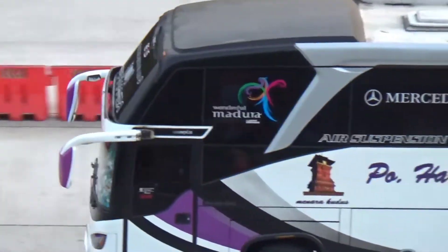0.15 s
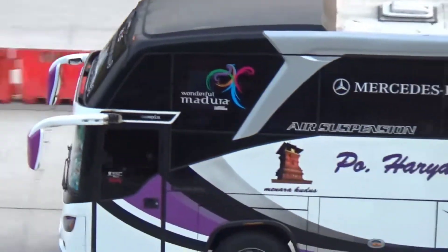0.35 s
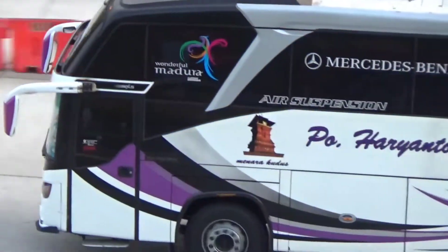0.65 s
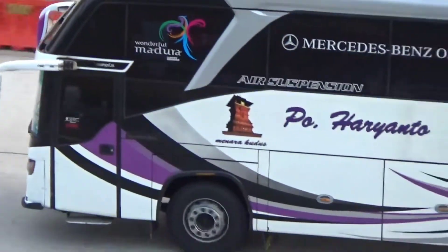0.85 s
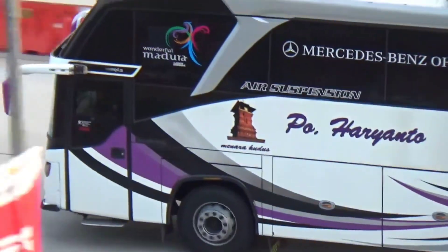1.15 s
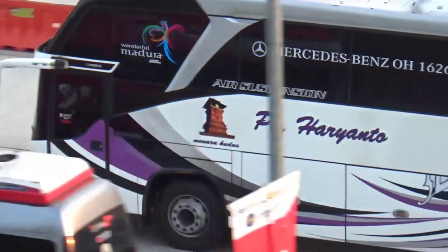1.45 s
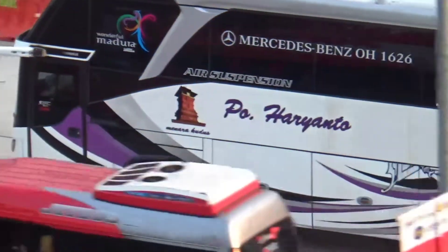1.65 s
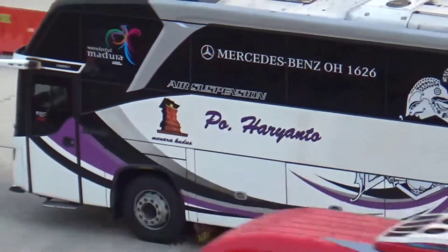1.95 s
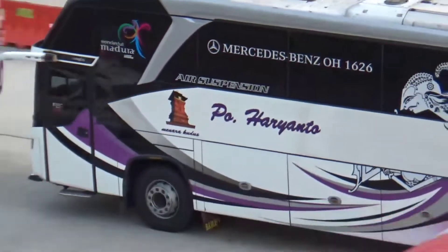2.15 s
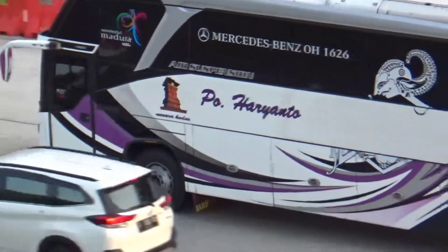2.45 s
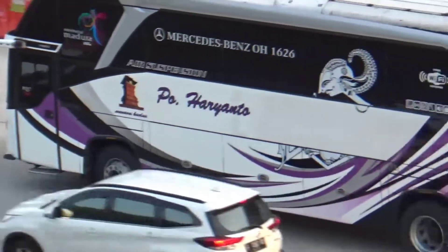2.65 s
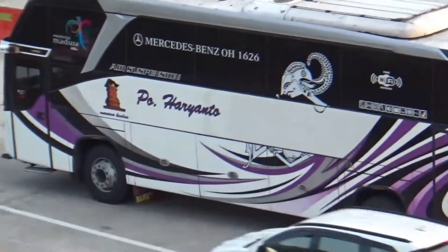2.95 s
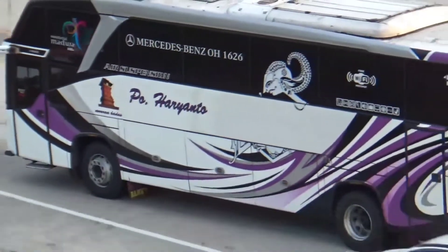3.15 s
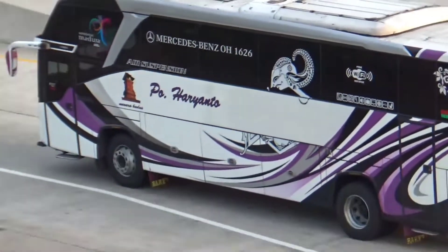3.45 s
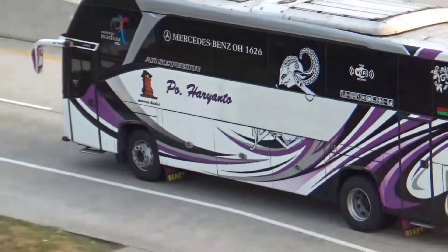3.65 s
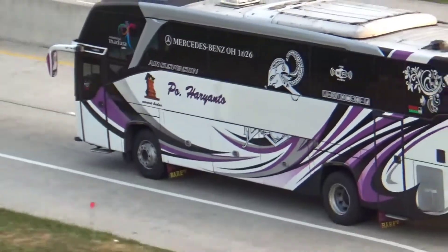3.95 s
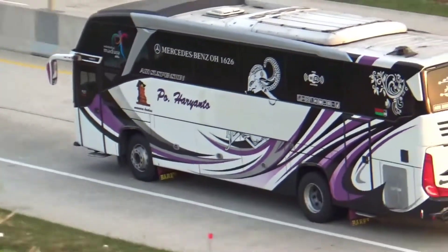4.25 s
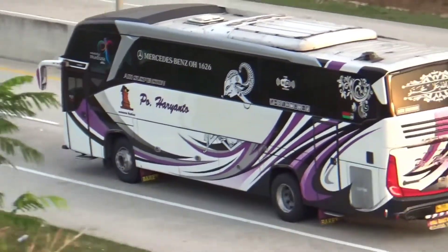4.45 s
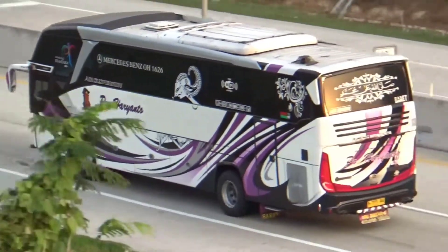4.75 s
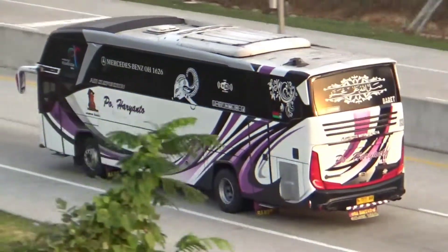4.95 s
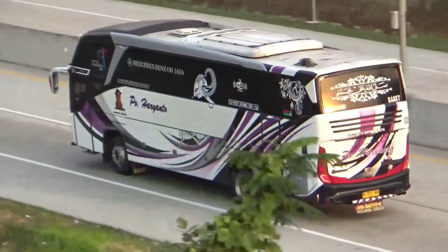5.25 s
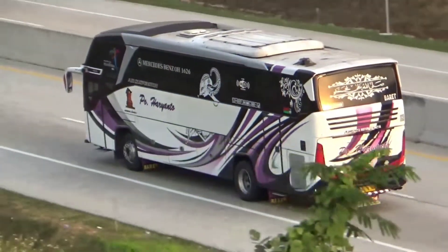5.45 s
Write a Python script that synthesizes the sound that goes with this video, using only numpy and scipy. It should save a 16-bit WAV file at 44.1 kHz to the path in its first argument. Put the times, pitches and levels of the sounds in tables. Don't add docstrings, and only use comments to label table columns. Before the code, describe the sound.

A coach rolls past on a concrete motorway for about 5.6 seconds, heard outdoors from a bank through small stereo microphones. Far traffic makes a steady, blurred roar, with a very light low wind murmur. At first a breathy, wavering tyre whine near 1 kHz sits over soft hiss; it strengthens from 0.9 s and peaks around 1.7 to 2.2 s. A faint hum near 370 Hz lasts until about 3.6 s, and a weak fan tone near 680 Hz until 1.8 s. Hiss dips near 2.5 s, then rises strongly around 2.8 to 3.8 s with thinner whistles near 2.8 kHz. A whine near 1.8 kHz flares about 1.7 s and 2.8 to 3.1 s, then dominates from 3.8 s. Short rough patches make the tread flare briefly throughout. From 3.7 s a faint small engine climbs in pitch. Hiss eases gradually, but the high whine and traffic continue to the end.

```python
import sys
import numpy as np
from scipy import signal
from scipy.fft import rfft, irfft, next_fast_len
from scipy.io import wavfile
from scipy.ndimage import uniform_filter1d, minimum_filter1d

SR = 44100
rng = np.random.default_rng(int(sys.argv[2]) if len(sys.argv) > 2 else 0)


def master(y):
    cut = np.clip(np.atleast_2d(y).T, -1, 1)
    pcm = np.round(cut * 32767)
    wavfile.write(sys.argv[1], SR, pcm.astype(np.int16))


def nominal_scale(level):
    x = np.asarray(level, float) / 20
    return 10 ** x


N = 246519

# (core width [Hz], skirt width [Hz], skirt shift [Hz], skirt level [dB])
PIPES = [
    (43.2, 180, 182, -5),
    (126, 260, 150.5, -1.5),
    (233, 497, -50, 5),
    (443, 1100, 150.5, -6),
]
# (time [s], level [dB], groove pitch [Hz])
FRONT_AXLE = [(0.0, -20, 981.4), (0.25, -26, 1025), (0.93, -15, 1000), (1.76, -11, 994.6),
              (1.82, -13.5, 1056), (1.93, -10, 997.7), (2.1, -16, 1010), (2.15, -11.5, 1026),
              (2.38, -19, 983.5), (2.94, -17, 980.6), (3.58, -17, 995.7), (3.61, -13.5, 981.6),
              (3.77, -23.5, 1013), (4.47, -25.5, 975.9), (4.51, -20.5, 993.2), (4.75, -25, 971),
              (5.57, -23.5, 992.7), (5.59, -30, 949.5)]
# (time [s], level [dB], groove pitch [Hz])
REAR_AXLE = [(0.0, -29.5, 1866), (1.18, -28.5, 1820), (1.63, -27, 1856), (1.73, -16, 1872),
             (1.76, -23, 1873), (2.4, -21, 1849), (2.44, -27, 1869), (2.77, -22.5, 1884), (2.83, -15, 1820),
             (3.02, -17.5, 1785), (3.11, -27, 1864), (3.14, -15.5, 1748), (3.5, -25, 1828),
             (3.8, -13.5, 1812), (4.45, -15.5, 1817), (4.58, -20, 1778), (4.81, -15, 1800),
             (5.59, -17.5, 1819)]
# (time [s], level [dB], lower pipe [Hz], upper pipe [Hz])
SHOULDERS = [(0, -32, 2780, 3670), (0.551, -30.5, 2900, 3760), (.8, -24.5, 2860, 3780),
             (1.001, -24, 2760, 3760), (1.5, -21, 2680, 3680), (1.851, -22.5, 2830, 3760),
             (2.36, -24.5, 2800, 3485), (2.499, -32, 2700, 3450), (2.831, -19.5, 2940, 3380),
             (3.052, -22, 2830, 3283), (3.32, -17, 2870, 3270), (3.42, -21, 2800, 4055),
             (3.68, -18, 2970, 3750), (3.929, -24, 2880, 3700), (4.15, -20.5, 2620, 3880),
             (4.64, -19, 2740, 3880), (4.899, -22.5, 2800, 3950), (5.59, -24, 2830, 3950)]
# (time [s], level [dB])
SIGHT = [(0, -30), (.2, -32), (.62, -27.5), (.95, -27), (1.302, -24), (1.8, -25.5), (2.1, -21.5),
         (2.39, -24), (2.498, -30), (2.66, -25), (2.8, -19), (3.28, -19.5), (3.4, -23), (3.72, -16.5),
         (4.15, -21.5), (4.65, -21.5), (5.2, -24.5), (5.59, -25)]
# (time [s], rise [dB], length [s])
PATCHES = [(0.84, 5.5, 0.048), (1.2, 3.5, .03), (1.37, 5.5, 0.06), (1.457, 4.5, 0.026), (1.549, 3.5, .04),
           (1.744, 4, 0.013), (2.062, 3, 0.058), (2.2, -0.5, 0.028), (2.27, 1, .03), (2.379, 0.5, 0.027),
           (2.76, -1, 0.027), (2.859, 4, 0.039), (3.071, 3, 0.014), (3.128, 3.5, 0.013), (3.305, 4, 0.05),
           (3.546, 0, 0.027), (3.72, -1, 0.057), (3.974, 2, 0.051), (4.353, 5, 0.034), (4.498, 3, 0.026)]
# (mean [dB], then shares [1] of front axle, rear axle, shoulders, sight, patches)
PIPE_FOLLOWS = [(-20, 0.96, .01, .01, .01, 0.058), (-20, .01, 1.007, .01, .01, .05),
                (-23.5, .01, .01, 0.96, .01, 0.062), (-30, .01, 0.12, 0.081, 1, .3)]
HISS_FOLLOWS = [(-31, .01, 0.059, .01, 0.72, 0.9), (-29.5, 0.059, .01, .01, 0.9, 1.18)]
RUMBLE_FOLLOWS = [(-36, 0.19, -0.095, .01, -0.042, .01), (-29.5, -0.068, -0.02, .01, -0.076, .01)]
PIPE_FLUTTER_DB = [.9, .8, 1.3, 2.0]
PITCH_WANDER = [.008, .006, .008, .015]
CORE_TUNING = [0.99, 0.98]
# (frequency [Hz], density [dB per Hz])
HISS_LOW = [(2710, -1), (4600, 4.5), (4870, 2), (5280, 6), (7000, -0.5), (9100, -61), (15400, -120)]
HISS_TOP = [(4120, -28), (7000, -0.5), (7570, 2.5), (9190, 4), (10900, -4.5), (14200, -9), (22000, -120)]
# (time [s], for the hiss [1], for the grooves [1])
ROAD_ECHO = [(0, 0.32, .05), (.7, .35, 0.15), (1.6, 0.36, 0.36), (2.3, 0.053, 0.44), (2.5, -0.054, 0.49),
             (3.1, -0.19, .75), (3.55, -0.17, 0.47), (3.8, -0.31, 0.072), (4.9, -0.6, 0.33),
             (5.59, -0.17, 0.17)]
# (time [s], lag [ms])
ECHO_LAG = [(0, 1.075), (.6, 1.06), (2.35, 1.105), (2.45, 1.225), (3.3, 1.24), (4.3, 1.262), (5.59, 1.275)]
# (time [s], frequency [Hz], level [dB])
HUM = [(0, 365, -52), (.4, 365, -43), (1.0, 368, -45), (1.4, 371, -40), (1.9, 371, -44), (2.5, 370, -44),
       (2.8, 362, -52), (3.2, 352, -46), (3.6, 350, -52)]
# (time [s], frequency [Hz], level [dB])
FAN = [(.2, 672, -52), (.7, 676, -45), (1.2, 680, -46), (1.7, 680, -54)]
# (time [s], firing rate [Hz], level [dB])
ENGINE = [(3.7, 183, -64), (3.87, 190, -51), (4.15, 205, -53), (4.4, 223, -51), (4.6, 238, -63),
          (4.95, 260, -57), (5.3, 266, -57), (5.59, 285, -59)]
# (frequency [Hz], density [dB per Hz])
FAR_ENGINES = [(88, -26), (150, -23), (333, -2.5), (361, -4), (397, -2.5), (580, -6), (750, -56),
               (1280, -120)]
FAR_TYRES = [(480, -43.5), (640, -6), (720, -4), (850, -0.5), (1100, -0.5), (1420, -10.5), (1800, -6),
             (2300, -21), (3500, -31.5)]
# (frequency [Hz], density [dB per Hz])
BREEZE = [(20, -26), (43, -28), (76, -3), (113, -2.5), (167, -1), (200, -10), (260, -30), (440, -120)]
# (frequency [Hz], left leads by [rad])
PORT_PHASE = [(80, 0), (500, -.92), (1400, -1.0), (1750, -.63), (2120, -.9), (2400, -.22), (3800, -.5),
              (11000, -.03)]
# (frequency [Hz], left minus right [dB])
PORT_BALANCE = [(1000, -0.5), (1450, -2), (1900, -0.3), (2250, -4.5), (2800, 2), (4200, -1.5), (5200, 0),
                (7500, -1.3)]


def grooves():
    levels = follow(PIPE_FOLLOWS) + np.array(PIPE_FLUTTER_DB)[:, None] * drift(12.0, count=4)
    pitches = groove_pitch()
    out = []
    for db, hz, (core, skirt, shift, skirt_db) in zip(levels, pitches, PIPES):
        tone = pair(*pipe(hz, core), scatter_db=-26.0)
        tone = tone + nominal_scale(skirt_db) * pair(*pipe(hz + shift, skirt), scatter_db=-17.0)
        out.append(nominal_scale(db - 3.0) * rms_one(tone))
    return out


def pipe(hz, width_hz):
    turn = 2 * np.pi * np.cumsum(hz) / SR
    a, b = slow(width_hz, (2, 2))
    swell = uniform_filter1d(a ** 2 + b ** 2, 2000)[0] / 2 if a.ndim == 1 else swell_of(a[0], b[0])
    return (a * np.cos(turn) + b * np.sin(turn)) * swell ** -.25


def swell_of(a, b):
    return uniform_filter1d(a ** 2 + b ** 2, 2000) / 2


def groove_pitch():
    long = [share * in_time(axle)[1] for share, axle in zip(CORE_TUNING, (FRONT_AXLE, REAR_AXLE))]
    wander = np.array(PITCH_WANDER)[:, None] * drift(8.0, count=4)
    return (long + in_time(SHOULDERS)[1:]) * (1 + wander)


def hiss():
    low_db, top_db = follow(HISS_FOLLOWS)
    low_flutter, top_flutter = drift(11.0, count=2)
    low = nominal_scale(low_db + .6 * low_flutter) * pair(*coloured(HISS_LOW), scatter_db=-11.0)
    top = nominal_scale(top_db + .9 * top_flutter) * pair(*coloured(HISS_TOP), scatter_db=-13.5)
    return low + top


def road_echo(x, lag_ms, strength):
    late = [np.interp(np.arange(N) - lag_ms * SR / 1000, np.arange(N), c) for c in x]
    late = signal.sosfiltfilt(signal.butter(2, 8500, fs=SR, output="sos"), late)
    return (x + strength * late) / np.sqrt(1 + strength ** 2)


def follow(rows):
    t = np.arange(N // 40 + 2) * 40 / SR
    swings = [np.interp(t, *np.transpose(curve)[:2]) for curve in (FRONT_AXLE, REAR_AXLE, SHOULDERS, SIGHT)]
    flare = sum(db * np.exp(-2 * ((t - s) / length) ** 2) for s, db, length in PATCHES)
    influences = np.array([db - db.mean() for db in swings] + [flare])
    rows = np.array(rows)
    return stretch(rows[:, :1] + rows[:, 1:] @ influences)


def rotating_tone(rows, orders):
    hz, db = in_time(rows)
    t = np.arange(N) / SR
    gate = np.clip(np.minimum(t - rows[0][0], rows[-1][0] + .2 - t) / .2, 0, 1)
    turn = 2 * np.pi * np.cumsum(hz) / SR + .3 * slow(2.0, ())
    level = nominal_scale(db + 2 * slow(3.0, ()))
    return np.sqrt(2) * gate * level * sum(nominal_scale(g) * np.sin(k * turn) for k, g in orders)


def rumble():
    engines_db, tyres_db = follow(RUMBLE_FOLLOWS) + 0.95 * drift(1.9, count=2)
    engines = nominal_scale(engines_db) * pair(*coloured(FAR_ENGINES), scatter_db=-16.0)
    tyres = nominal_scale(tyres_db + 3) * pair(*coloured(FAR_TYRES), scatter_db=-15.0)
    return engines + tyres


def breeze():
    level = nominal_scale(-60 + 3.0 * slow(4.0, ()))
    return level * pair(*coloured(BREEZE), scatter_db=-8.0)


def ports(x):
    size = next_fast_len(N + 2048)
    hz = np.arange(size // 2 + 1) * SR / size
    half = nominal_scale(at_hz(PORT_BALANCE, hz) / 2) * np.exp(.5j * at_hz(PORT_PHASE, hz))
    return irfft(rfft(x, size) * [half, 1 / half], size)[:, :N]


def pair(direct, scattered, scatter_db):
    return direct + nominal_scale(scatter_db) * scattered * [[1], [-1]]


def coloured(spectrum):
    size = next_fast_len(N)
    gain = nominal_scale(at_hz(spectrum, np.arange(size // 2 + 1) * SR / size))
    return rms_one(irfft(rfft(rng.standard_normal((2, size))) * gain, size)[:, :N])


def lowpassed_noise(width_hz, rate, shape, run_in):
    r = np.exp(-2 * np.pi * width_hz / rate)
    noise = signal.lfilter([1], [1, -2 * r, r * r], rng.standard_normal(shape))
    return rms_one(noise[..., run_in:])


def slow(width_hz, shape):
    return lowpassed_noise(width_hz, SR, shape + (N + SR,), SR)


def drift(rate_hz, count):
    return stretch(lowpassed_noise(rate_hz, SR / 40, (count, N // 40 + 1002), 1000))


def stretch(coarse):
    return np.array([np.interp(np.arange(N) / 40, np.arange(len(row)), row) for row in coarse])


def in_time(rows):
    s, *columns = np.transpose(rows)
    return [np.interp(np.arange(N) / SR, s, c) for c in columns]


def at_hz(points, hz):
    known_hz, values = np.transpose(points)
    return np.interp(np.log(hz + 1), np.log(known_hz + 1), values)


def rms_one(x):
    return x / np.sqrt(np.mean(np.abs(x) ** 2) + 1e-20)


def scene():
    hiss_echo, groove_echo = in_time(ROAD_ECHO)
    lag_ms = in_time(ECHO_LAG)[0] + .004 * slow(2.0, ())
    *low_pipes, top_pipe = grooves()
    tyres = road_echo(sum(low_pipes), 1.073, groove_echo)
    tyres = tyres + road_echo(hiss(), lag_ms, hiss_echo)
    tyres = tyres + top_pipe
    tyres = signal.sosfilt(signal.butter(4, 500, "high", fs=SR, output="sos"), tyres)
    engines = rotating_tone(HUM, [(1, 0)]) + rotating_tone(FAN, [(1, 0)])
    engines = engines + rotating_tone(ENGINE, [(1, 0), (2, 0)])
    return ports(tyres + rumble() + engines) * nominal_scale(1.97) + breeze()


def roll_off(x):
    return signal.sosfilt(signal.butter(12, 11210, fs=SR, output="sos"), x)


def record(dry):
    ceiling, window = .92, 221
    room_left = np.minimum(1, ceiling / (np.abs(dry).max(axis=0) + 1e-9))
    held = dry * uniform_filter1d(minimum_filter1d(room_left, size=window), size=window)
    held = signal.sosfilt(signal.butter(1, 35, "high", fs=SR, output="sos"), held)
    size = next_fast_len(N)
    passed = np.arange(size // 2 + 1) * SR / size < 11010
    held = irfft(rfft(held, size) * passed, size)[:, :N]
    return roll_off(held)


dry = scene()
out = record(dry)
master(out)
```